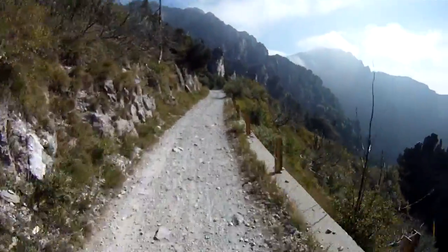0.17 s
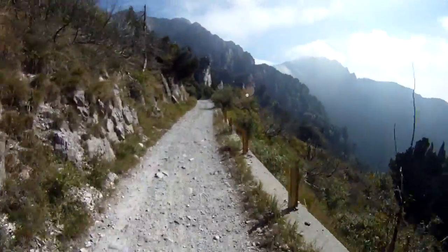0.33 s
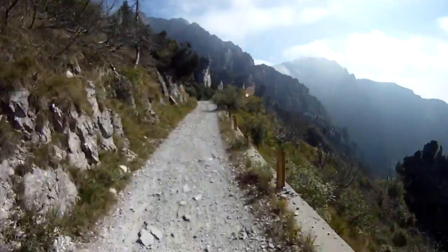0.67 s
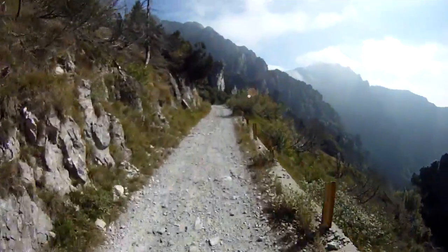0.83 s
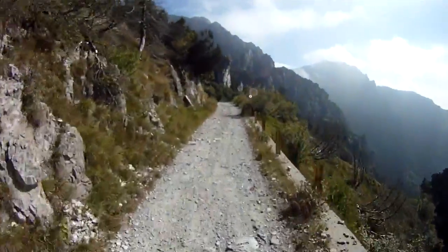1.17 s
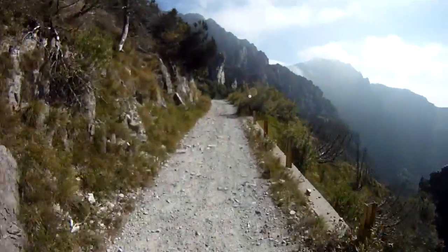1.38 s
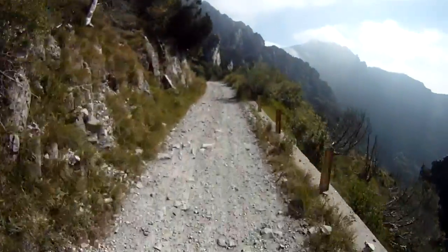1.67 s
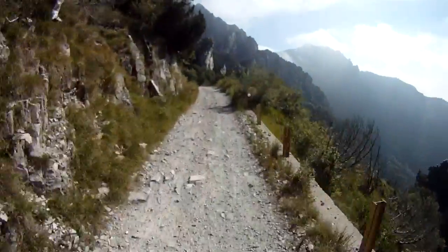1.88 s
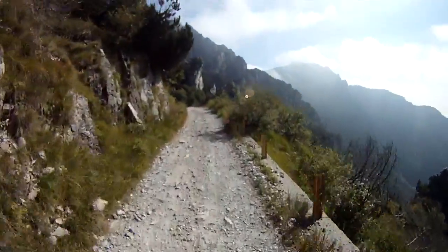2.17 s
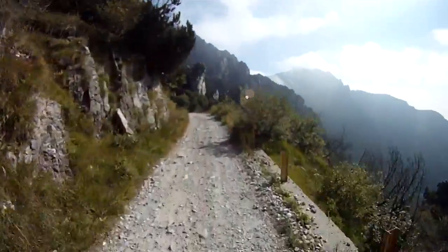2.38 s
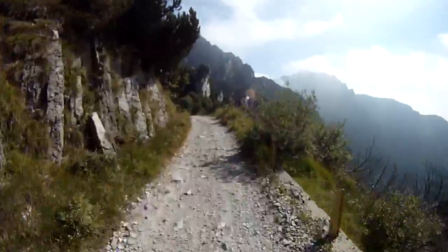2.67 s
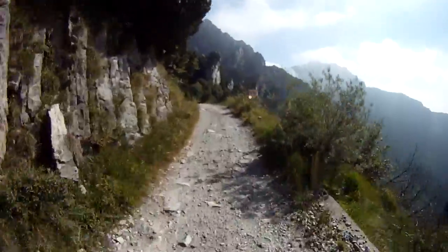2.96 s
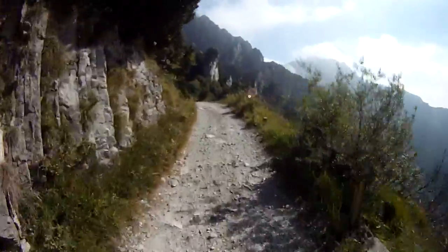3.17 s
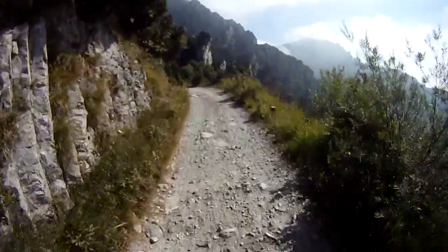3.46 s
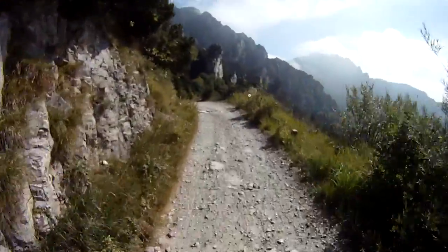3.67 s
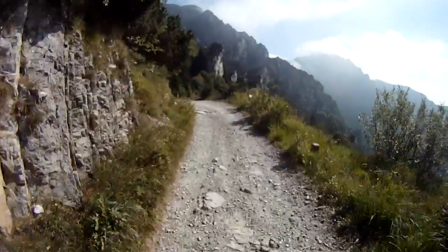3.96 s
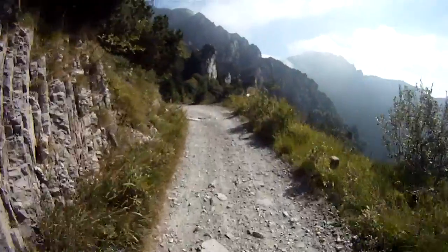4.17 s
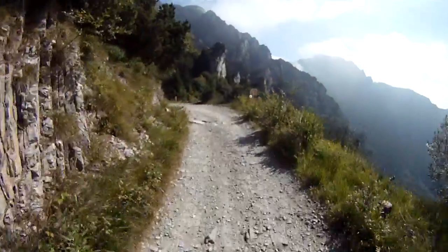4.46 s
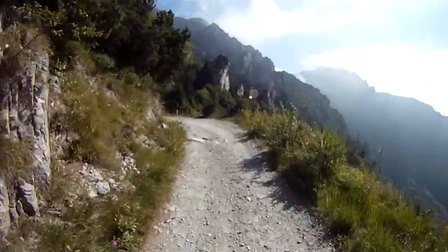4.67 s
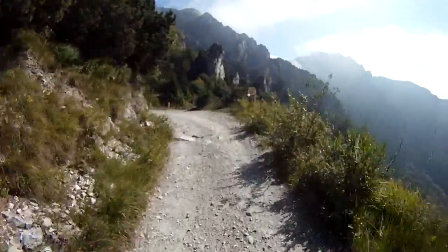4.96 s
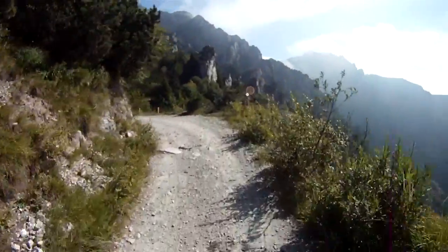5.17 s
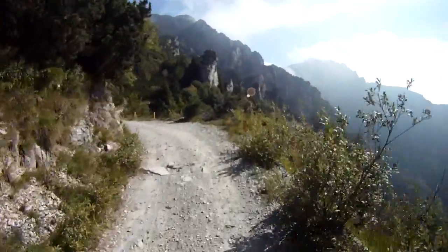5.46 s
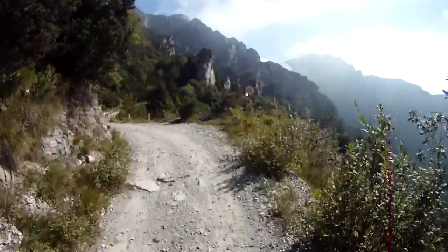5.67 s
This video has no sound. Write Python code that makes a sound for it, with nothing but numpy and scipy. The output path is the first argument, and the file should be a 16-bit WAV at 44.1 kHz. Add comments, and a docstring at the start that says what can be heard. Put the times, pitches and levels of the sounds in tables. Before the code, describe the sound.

A single-cylinder motorcycle runs at low revs along a loose gravel track, its exhaust thumping and its valves chattering. The tyres crunch throughout, stones snap and knock, and loose parts rattle over bumps, loudest at about one and a half seconds. From halfway the engine slows, and the crunch thins near the end. The on-board microphone sounds boxy and gritty, with a deep rumble from the jolts.

```python
"""Motorcycle on a stony track

A single-cylinder four-stroke trickles along a mountain track, easing off as it goes. Each firing
thumps in the exhaust, the valve gear chatters, gravel crunches, stones snap and knock, and loose
parts clatter over bumps. A small on-board camera hears it through its ringing case, shaken by
the ride, and samples it coarsely."""
import sys
import numpy as np
from scipy import signal
from scipy.fft import rfft, irfft
from scipy.io import wavfile
from scipy.ndimage import uniform_filter1d, map_coordinates

SR = 44100
rng = np.random.default_rng(int(sys.argv[2]) if len(sys.argv) > 2 else 0)


def log_audio(samples):
    """Write samples as a 16-bit WAV file to the path given in sys.argv[1]."""
    # one column per channel
    frames = np.atleast_2d(samples).T
    # limit to full scale, then quantise
    limited = np.clip(frames, -1, 1)
    pcm = np.round(limited * 32767).astype(np.int16)
    wavfile.write(sys.argv[1], SR, pcm)


N = 257103

# valve gear knocks in one engine cycle: share_of_cycle after the firing, level_db
VALVE_GEAR = [(.08, -1), (.25, -1.5), (.52, -9), (.79, 0)]
# resonances of the camera case: pitch_hz, width_hz, lift_db
CASE_MODES = [(432, 37, 2.5), (597, 65, 3), (890.5, 81, 8.5), (956, 34, 6.5), (1129, 123, 11),
              (1894, 31, 8.5), (1984, 85, 9), (2087, 136, 8), (2339, 208, 14.5), (2500, 210, 2.5),
              (2920, 26, 6), (3440, 320, 4.5), (3628, 213, 9), (3910, 160, 1.5), (4797, 59, 8)]
# bright spectrum of cracks and pebble ticks: frequency_hz, gain_db
CRACK_COLOUR = [(300, -28), (1400, -7), (2000, 6), (3000, 10), (4500, 7.5), (5400, 7.5), (6200, -21.5)]
# wheels dropping over rocks: centre_s, level_db
ROCKS = [(0.099, -27), (0.202, -30), (0.261, -24), (0.49, -30), (0.91, -25.5), (1.069, -23.5), (1.478, -21),
         (1.675, -30), (1.86, -29.5), (2.142, -28), (2.337, -29), (2.493, -21.5), (2.762, -23.5),
         (2.83, -30), (2.893, -28), (3.165, -29), (3.749, -27.5), (3.952, -28), (4.138, -27.5),
         (4.192, -30.5), (4.62, -33), (4.841, -34), (4.898, -26), (5.044, -29), (5.124, -28.5)]


def undb(db):
    """Decibels to gain."""
    return 10 ** (np.asarray(db) / 20)


def level(x, db):
    """The sound at a given rms level."""
    return x * undb(db) / np.sqrt(np.mean(x ** 2))


def even(x, window_s):
    """Irons out the slow swells of a rumble, leaving its rms near 1."""
    k = int(window_s * SR)
    return x / np.sqrt(uniform_filter1d(uniform_filter1d(x ** 2, k), k))


def curve(points):
    """Joins (time_s, value) points into a value per sample."""
    return np.interp(np.arange(N) / SR, *np.transpose(points))


def ring(x, *bands):
    """Resonances in series, each (pitch_hz, width_hz) with gain 1 at its centre."""
    for hz, width_hz in bands:
        x = signal.lfilter(*signal.iirpeak(hz, hz / width_hz, fs=SR), x)
    return x


def colour(x, points=None, modes=(), size=4096):
    """Minimum-phase filter from a smooth spectrum and resonant peaks."""
    f = np.maximum(np.arange(size // 2 + 1) * SR / size, 1)
    db = np.zeros(len(f))
    if points is not None:
        point_hz, point_db = np.transpose(points)
        db += np.interp(np.log(f), np.log(point_hz), point_db)
    for hz, width, lift in modes:
        db += lift / (1 + (2 * (f - hz) / width) ** 2)
    cepstrum = irfft(np.log(undb(db)))[:size // 2]
    cepstrum[1:] *= 2
    return signal.fftconvolve(x, irfft(np.exp(rfft(cepstrum, size))))[:N]


def wander(rate_hz):
    """Smooth random drift with a spread near 1."""
    k = int(SR / rate_hz)
    held = rng.standard_normal(N)[np.arange(N) // k]
    return level(uniform_filter1d(held, k), 0)


def fade(x, decay_s):
    """Gives every impulse an exponential tail."""
    return signal.lfilter([1], [1, -np.exp(-1 / (decay_s * SR))], x)


def strikes(cycle, scatter_db):
    """One impulse for each whole cycle, its size spread by scatter_db."""
    impulses = np.diff(np.floor(cycle), prepend=np.floor(cycle[0]))
    return impulses * undb(scatter_db * rng.standard_normal(N))


def grains(per_s, scatter_db, decay_s):
    """Random tiny impacts, each a quickly dying puff of noise."""
    hits = (rng.random(N) < per_s / SR) * undb(scatter_db * np.clip(rng.standard_normal(N), -2, 2))
    return level(np.sqrt(fade(hits ** 2, decay_s)) * rng.standard_normal(N), 0)


def bursts(events, tail_s):
    """Envelope of short events that start at once, hold and die away."""
    envelope = np.zeros(N)
    for start_s, db, hold_s in events:
        start = int(start_s * SR)
        age = np.arange(min(N - start, SR // 5)) / SR
        envelope[start:start + len(age)] += undb(db) * np.exp(-np.maximum(age - hold_s, 0) / tail_s)
    return envelope


def exhaust(firings, firing_hz):
    """Each firing rings the silencer: a round putt at low revs, a harder bark under load."""
    load = (firing_hz / firing_hz.max()) ** 4
    # off load the gas leaves gently, so the putt starts early and swells
    early = np.roll(firings, -int(0.00663 * SR))
    putt = level(ring(early, (202, 67), (199, 62), (206.5, 75)), 0)
    thump = level(ring(firings, (220.7, 45.3), (255, 100)), 0)
    bark = level(ring(firings, (360, 146), (350, 290)), -15.5)
    return level((1 - load) * putt + load * (thump + bark), 0.24)


def low_boom(firings):
    """A low boom near 100 Hz rings just after each firing, over a rumble of random jolts."""
    late = np.roll(firings, int(0.00863 * SR))
    boom = level(ring(late, (96.1, 9.7), (106, 29)), -1.8)
    jolts = even(ring(rng.standard_normal(N), (89, 29), (100.6, 39)), window_s=0.4)
    return boom + undb(-5.5) * jolts


def puffs(cycle, decay_cycles=0.35):
    """A soft puff of gas leaves the silencer with each firing."""
    gas = ring(rng.standard_normal(N), (350, 360), (350, 360))
    return level(gas * np.exp(-(cycle % 1) / decay_cycles), -12.5)


def chatter(cycle):
    """Valves and piston tick at fixed points of the cycle over the whirr of chain and gears."""
    # spectra of the ticks and of the whirr: frequency_hz, gain_db
    tick_colour = [(200, -6.5), (700, -3), (1400, -4), (1750, -3.5), (2800, -10.5), (3600, -8.5),
                   (4500, -14.5), (6000, -23.5)]
    whirr_colour = [(100, -4), (300, -2), (750, -4), (1400, -4), (1750, -9.5), (2800, -10), (4500, -18.5),
                    (6000, -31.5)]
    hits = sum(undb(db) * strikes(cycle - share, scatter_db=0) for share, db in VALVE_GEAR)
    ticks = fade(hits, decay_s=0.0075) * rng.standard_normal(N)
    ticking = level(colour(ticks, tick_colour, CASE_MODES), -3.4)
    whirr = grains(per_s=500, scatter_db=1.5, decay_s=0.0028)
    return ticking + level(colour(whirr, whirr_colour, CASE_MODES), -0.29)


def gravel(cycle):
    """Stones grind under the tyres in uneven patches; the engine's knocks pulse the rattle."""
    # spectrum of the crunch: frequency_hz, gain_db
    crunch_colour = [(200, -16), (700, -1), (1400, 3), (1750, 1.5), (2800, 2.5), (3500, 0), (4400, -8.5),
                     (5200, -5), (5800, -53), (6600, -25.5)]
    crunch = grains(per_s=340, scatter_db=3.5, decay_s=0.0047) + undb(1) * rng.standard_normal(N)
    # each knock of the valve gear shakes the case for a moment
    throb_db = 3 * sum(undb(db) * np.exp(-((cycle - share) % 1) / 0.12) for share, db in VALVE_GEAR)
    patches_db = 2.34 * wander(rate_hz=28)
    grinding = level(colour(crunch * undb(throb_db + patches_db), crunch_colour, CASE_MODES), 0.72)
    # single pebbles tick through the air, brighter than what comes through the case
    pebbles = grains(per_s=42, scatter_db=3, decay_s=0.00099)
    return grinding + level(colour(pebbles, CRACK_COLOUR), -24)


def bumps(contact_s=0.012, spring_hz=25.5, swing_s=0.028):
    """Each rock pushes the frame softly; the suspension dips before and after, and a low boom rings."""
    hits = np.zeros(N)
    for centre_s, db in ROCKS:
        hits[int(centre_s * SR)] += undb(db)
    lag = np.arange(-SR // 10, SR // 10) / SR
    swing = np.cos(2 * np.pi * spring_hz * lag) * np.exp(-(lag / swing_s) ** 2)
    sway = signal.fftconvolve(hits, swing - swing.mean(), "same")
    pushes = signal.fftconvolve(hits, np.hanning(int(contact_s * SR)), "same")
    return 0.5 * (sway + pushes) + undb(4.5) * ring(pushes, (100, 17))


def clatters():
    """Loose metal and plastic parts buzz densely over bumps and ring on for a moment."""
    # each rattle: start_s, relative_db, hold_s, brightness_db_per_octave
    rattles = [(0.746, -46, .019, -6), (1.42, -41.5, 0.0057, 11), (1.446, -31, 0.015, 3.5),
               (1.458, -37.5, 0.0091, -6), (1.471, -41.5, 0.025, -6), (1.541, -47.5, 0.028, -11),
               (1.685, -49, 0.011, 0), (2.742, -48, 0.024, -2), (3.114, -50, .015, 5),
               (3.25, -49.5, .018, 2), (3.675, -48.5, 0.015, 5.5), (3.843, -49, 0.0091, 0),
               (4.085, -39, 0.0052, 0.5), (4.196, -41.5, 0.0074, -10), (4.392, -50, .008, -12),
               (4.671, -48, 0.022, -8), (4.873, -49, .014, 1), (4.892, -36.5, 0.017, 1.5),
               (4.943, -42.5, 0.011, -2), (5.289, -46, 0.012, 9), (5.31, -48.5, .022, -8),
               (5.443, -51.5, 0.023, -5)]
    # spectrum of the parts scraping: frequency_hz, gain_db
    scrape_colour = [(200, -39), (1500, -15), (1800, -6), (2350, 6.5), (2800, 8.5), (3600, 12.5),
                     (4700, 1.5), (5400, 10), (6200, -41)]
    # resonances of the parts: pitch_hz, width_hz, relative_db
    part_modes = [(1931, 91, 0.5), (2468, 34, -4), (3340, 87, -15.5), (3507, 51, -3.5), (4460, 28, -50)]
    buzz = rng.standard_normal(N) * undb(2 * wander(rate_hz=500))

    def force(hz):
        """The push at one pitch: harder contacts favour the high modes."""
        events = [(s, db + tilt * np.log2(hz / 2700), hold_s) for s, db, hold_s, tilt in rattles]
        return buzz * bursts(events, tail_s=0.0035)

    scrape = colour(force(5040), scrape_colour, CASE_MODES)
    scrape /= np.std(colour(buzz, scrape_colour, CASE_MODES))
    ringing = sum(undb(db) * ring(force(hz), (hz, width)) / np.std(ring(buzz, (hz, width)))
                  for hz, width, db in part_modes)
    return undb(-7) * scrape + undb(-5) * ringing


def cracks():
    """Sharp, bright cracks with a dry crunch: snapping stones and the hard edge of the loudest clanks."""
    # each crack: start_s, level_db, hold_s
    events = [(0.427, -52, 0.025), (0.883, -51.5, 0.036), (1.036, -50.5, 0.038), (1.102, -56, .047),
              (1.221, -56, .006), (1.446, -34.5, 0.014), (2.096, -51, 0.0083), (2.201, -50, .012),
              (2.406, -47.5, 0.013), (2.645, -54, 0.024), (2.688, -50, .008), (2.75, -55, .015),
              (2.94, -50.5, 0.011), (4.081, -52, .003), (4.658, -54, 0.0045), (4.717, -48, 0.006),
              (4.889, -45, 0.022), (5.291, -53, .008), (5.371, -53, .013), (5.61, -48.5, 0.012)]
    chips = grains(per_s=700, scatter_db=4.5, decay_s=0.0012)
    crunch = level(colour(chips, CRACK_COLOUR), 0) * bursts(events, tail_s=0.0077)
    attacks = bursts([(start_s, db, 0) for start_s, db, _ in events], tail_s=0.00094)
    crack = level(colour(rng.standard_normal(N), CRACK_COLOUR), 2.3) * attacks
    return crunch + crack


def knocks():
    """Flung stones hit the underside with a dull, damped knock; the camera case rings faintly after."""
    # each flung stone: start_s, relative_db, pitch_hz
    stones = [(2.525, -38, 1010), (2.561, -39, 874), (2.751, -28.5, 946), (3.072, -32.5, 890),
              (3.403, -36.5, 1000), (3.758, -26, 986), (3.827, -37.5, 990), (3.953, -33, 1010),
              (4.262, -37, 890), (4.41, -41, 725), (4.944, -39.5, 1000), (5.294, -39.5, 960)]
    hits, size = np.zeros(N), 2048
    for start_s, db, hz in stones:
        start = int(start_s * SR)
        knock = ring(signal.unit_impulse(size), (hz, 280), (hz, 460), (hz, 1200))
        hits[start:start + size] += undb(db) * knock / np.abs(knock).max()
    return undb(-10) * hits + undb(-7) * colour(hits, modes=CASE_MODES)


def shaking(rock_lift_db=3, reach_s=0.068):
    """Jolts and air buffet the camera with a deep rumble, stronger on the rough ground near each rock."""
    # spectrum of the rumble: frequency_hz, gain_db
    rumble_colour = [(8, -25.5), (18, -4), (26, 1), (36, -5), (50, -16.5), (70, -15.5), (120, -31),
                     (160, -32), (270, -32), (600, -64)]
    rumble = even(colour(rng.standard_normal(N), rumble_colour, size=16384), window_s=0.052)
    t = np.arange(N) / SR
    near_rock = np.max([np.exp(-((t - centre_s) / reach_s) ** 2) for centre_s, _ in ROCKS], axis=0)
    return rumble * undb(rock_lift_db * near_rock)


def chain_drive(coast_from_s=2.87, coast_to_s=3.98, fade_s=0.33, lift_db=8.5):
    """The chain's wavering drone swells as the bike coasts, alongside a faint, thin whine."""
    coasting = curve([(coast_from_s - fade_s, 0), (coast_from_s, 1),
                      (coast_to_s, 1), (coast_to_s + fade_s, 0)])
    drone = level(ring(rng.standard_normal(N), (566, 22.5), (552, 58)), -70)
    whine = level(ring(rng.standard_normal(N), (4236, 24), (4236, 50)), -77)
    return drone * undb(lift_db * coasting) + whine


def scene():
    """Engine speed, throttle and the roughness of the track ride the levels of the running layers."""
    # engine speed: time_s, firing_hz
    speed = [(0.0, 18.75), (0.55, 20.33), (1.15, 20.02), (1.3, 17.0), (1.55, 19.08), (2.0, 18.65),
             (2.4, 19.11), (2.8, 18.37), (3.0, 16.06), (3.3, 16.64), (3.7, 15.16), (4.2, 14.35),
             (4.6, 13.97), (4.85, 14.26), (5.15, 14.31), (5.55, 12.14), (5.83, 14.58)]
    # throttle, as the level of the exhaust: time_s, level_db
    throttle = [(0, -48.5), (0.45, -50), (0.75, -51.5), (1.07, -49.6), (1.23, -55.1), (1.42, -50),
                (2.55, -50), (2.92, -54), (3.5, -51.0), (5.08, -49), (5.28, -55.5), (5.83, -55.5)]
    # how hard the tyres work the gravel: time_s, level_db
    roughness = [(0, -46.5), (0.5, -46), (1.1, -49), (1.3, -47.5), (1.55, -47.5), (1.95, -50),
                 (2.35, -45.5), (2.95, -50.5), (3.7, -52.5), (4.15, -48.5), (4.45, -50), (4.9, -47.5),
                 (5.2, -55.5), (5.35, -51.5), (5.6, -55), (5.83, -59)]
    firing_hz, throttle_db, crunch_db = curve(speed), curve(throttle), curve(roughness)
    cruise_hz, cruise_crunch_db = 18, -49
    cycle = 0.5 + np.cumsum(firing_hz) / SR
    firings = strikes(cycle, scatter_db=0.03)

    rev_octaves = np.log2(firing_hz / cruise_hz)
    effort_db = throttle_db - throttle_db.mean()
    boom_db = -44.5 + 3.5 * rev_octaves + 0.47 * effort_db
    puff_db = throttle_db.mean() + 1.65 * effort_db
    chatter_db = -51 + 6.5 * rev_octaves
    shake_db = -41 + 0.29 * (crunch_db - cruise_crunch_db)

    engine = exhaust(firings, firing_hz) * undb(throttle_db)
    engine += low_boom(firings) * undb(boom_db)
    engine += puffs(cycle) * undb(puff_db)
    mechanics = chatter(cycle) * undb(chatter_db) + chain_drive()
    track = gravel(cycle) * undb(crunch_db) + bumps() + clatters() + cracks() + knocks()
    return (engine + mechanics + track + shaking() * undb(shake_db))[None]


def record(dry):
    """The camera samples slowly and holds each value, which mirrors the sound into a gritty treble."""
    camera_hz, cutoff_hz, oversample = 11508, 14700, 4
    instants = np.arange(0, N, SR / camera_hz)
    samples = map_coordinates(dry[0], [instants], order=3, mode="nearest")
    stairs = samples[(np.arange(N * oversample) * camera_hz / (SR * oversample)).astype(int)]
    held = signal.resample_poly(stairs, 1, oversample)
    lowpass = signal.ellip(10, 0.2, 80, cutoff_hz, fs=SR, output="sos")
    return signal.sosfilt(lowpass, held)[None]


dry = scene()
out = record(dry)
log_audio(out)
```